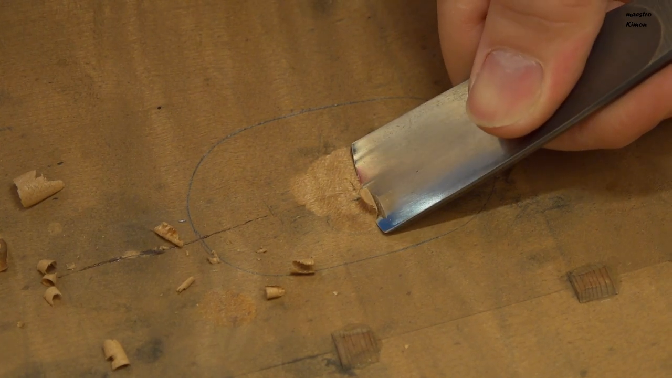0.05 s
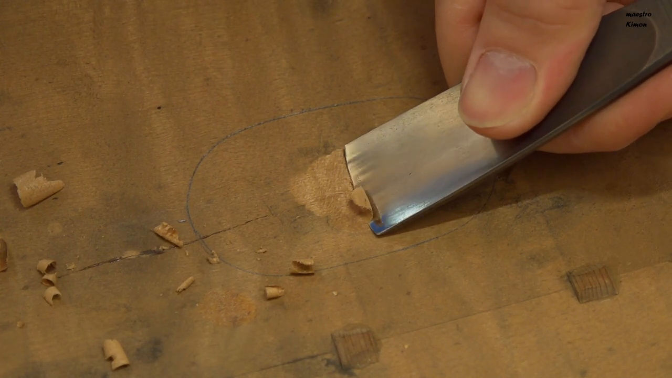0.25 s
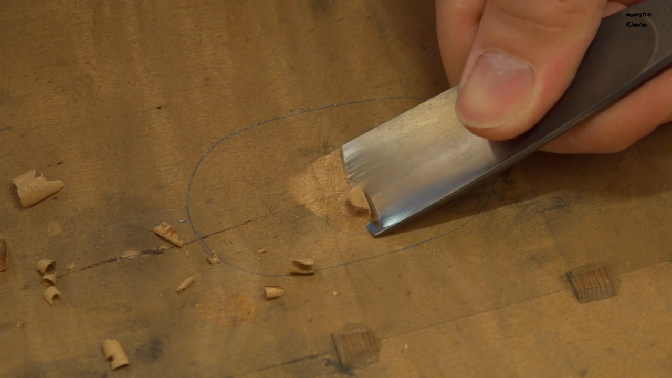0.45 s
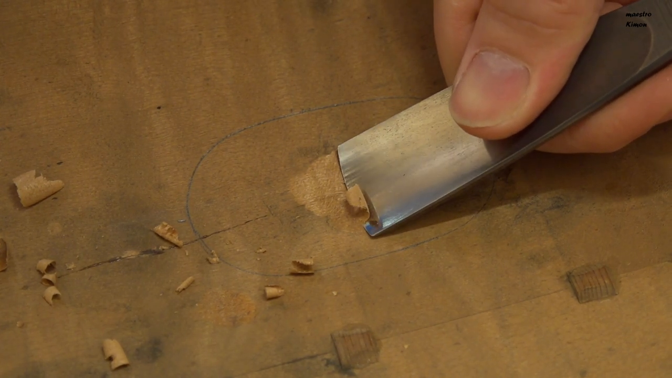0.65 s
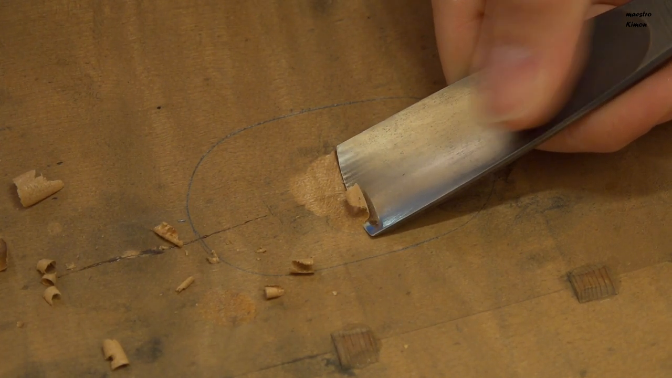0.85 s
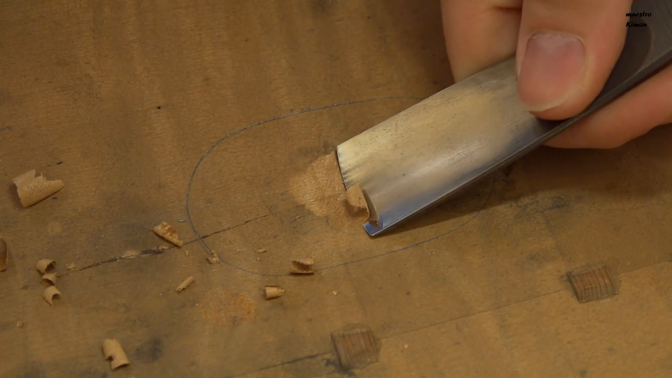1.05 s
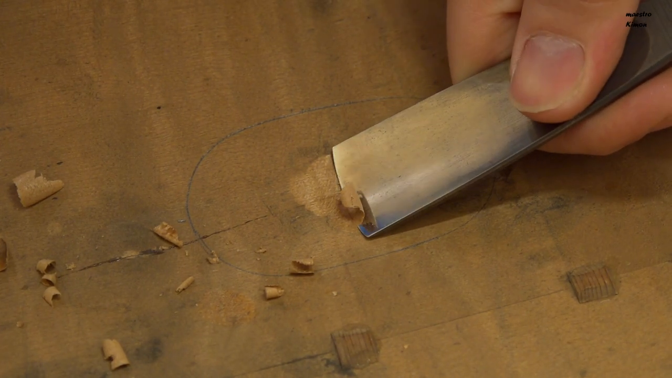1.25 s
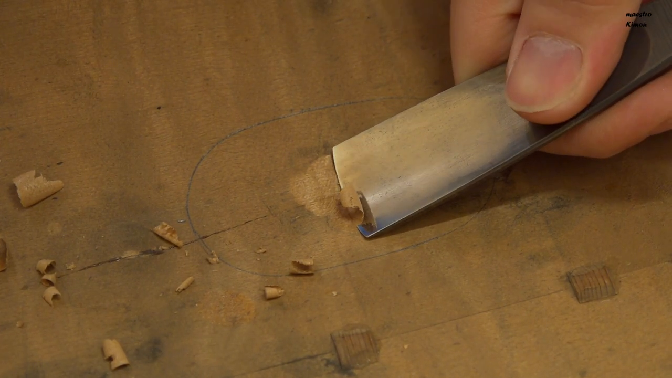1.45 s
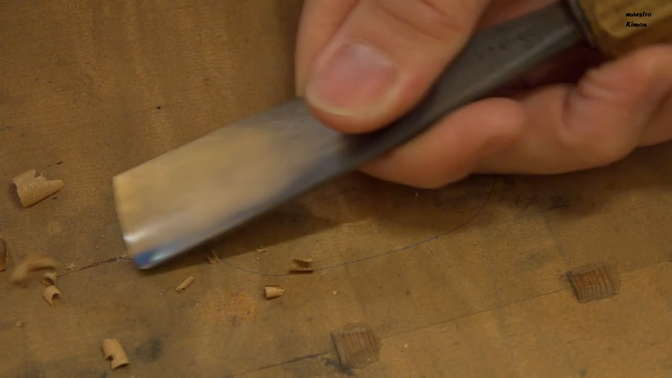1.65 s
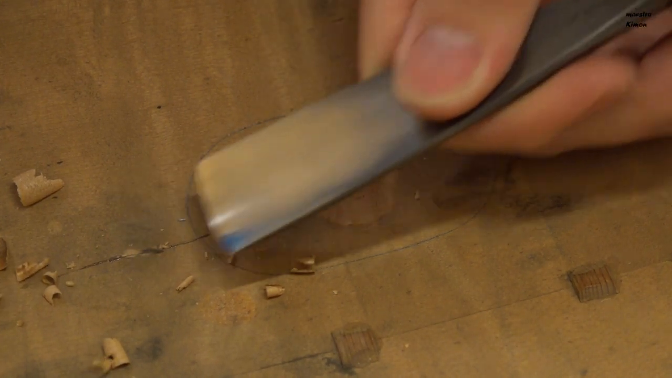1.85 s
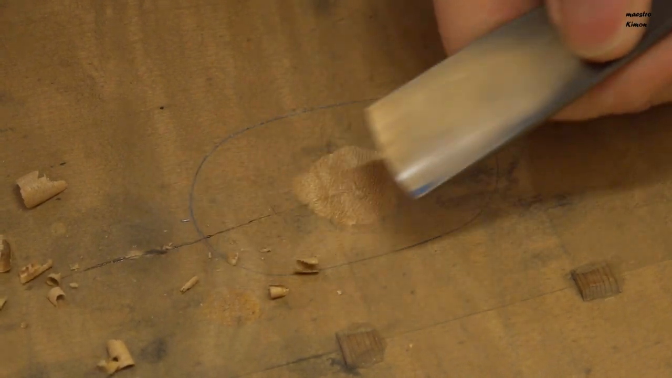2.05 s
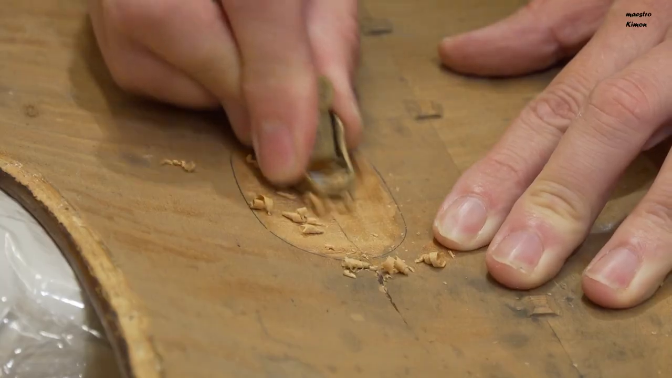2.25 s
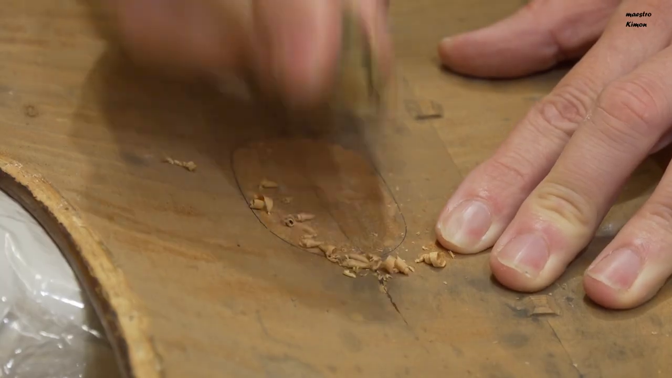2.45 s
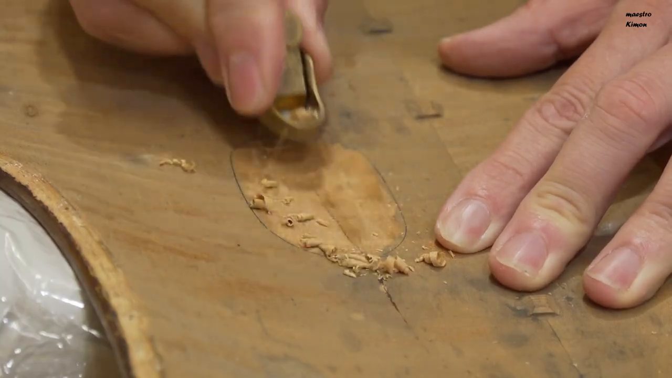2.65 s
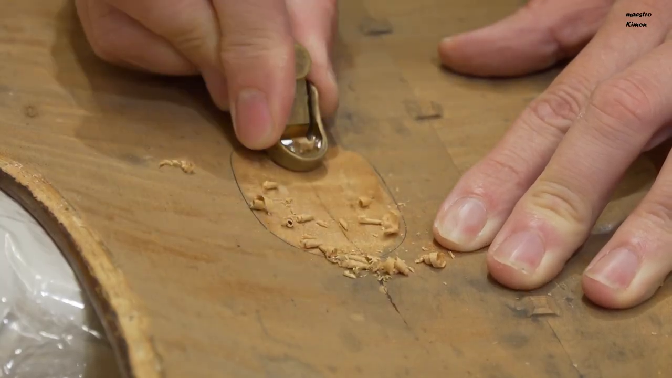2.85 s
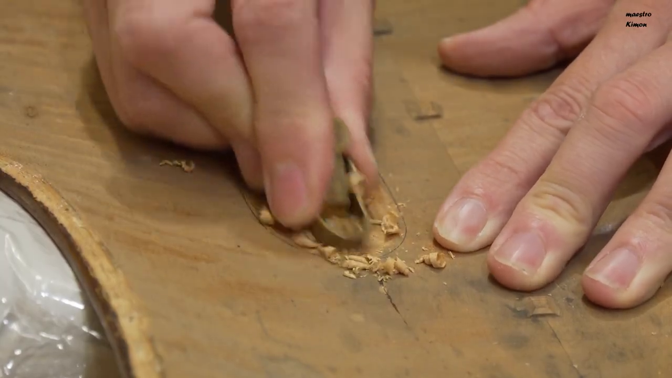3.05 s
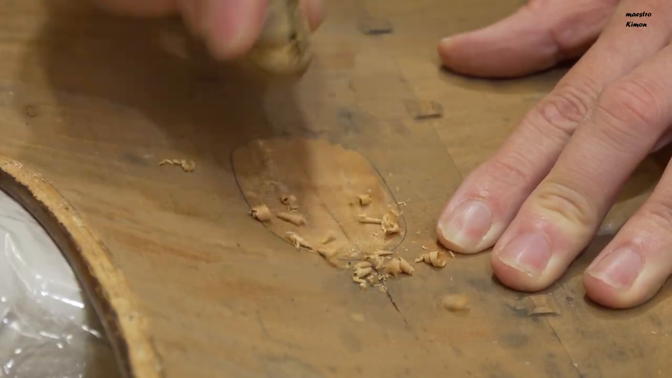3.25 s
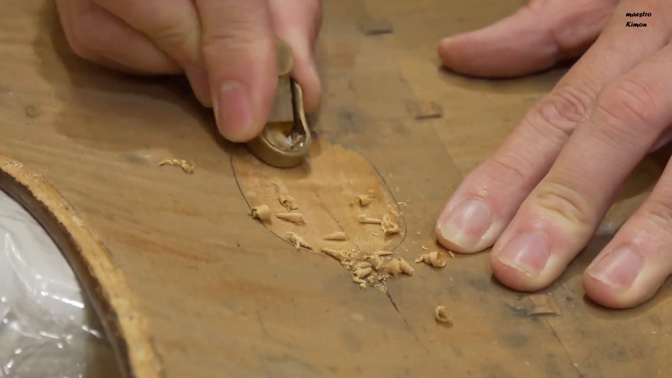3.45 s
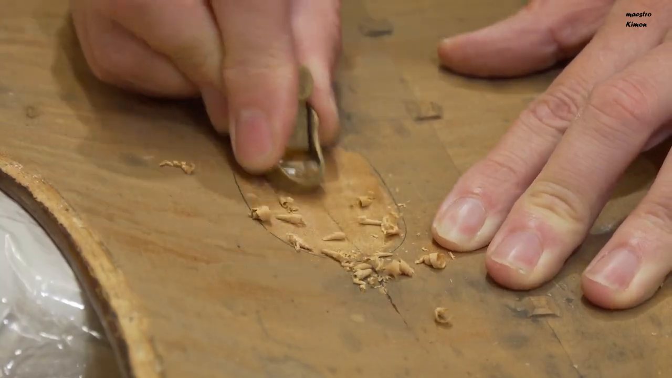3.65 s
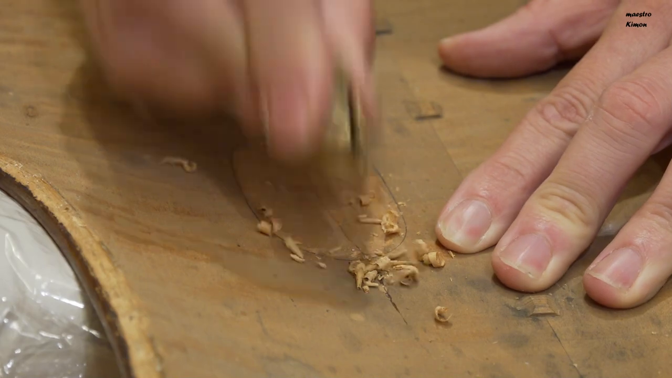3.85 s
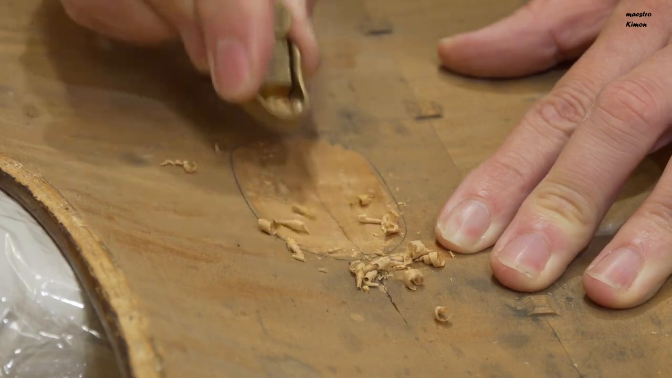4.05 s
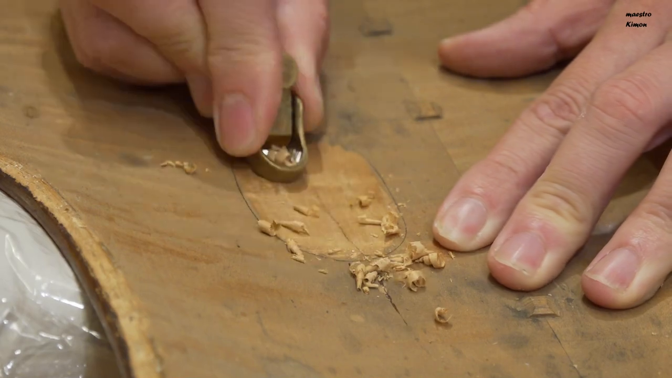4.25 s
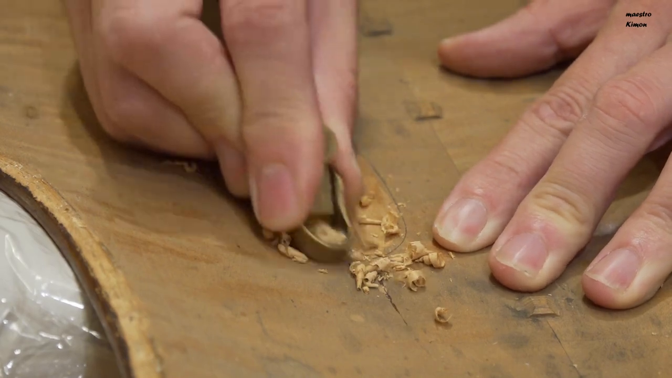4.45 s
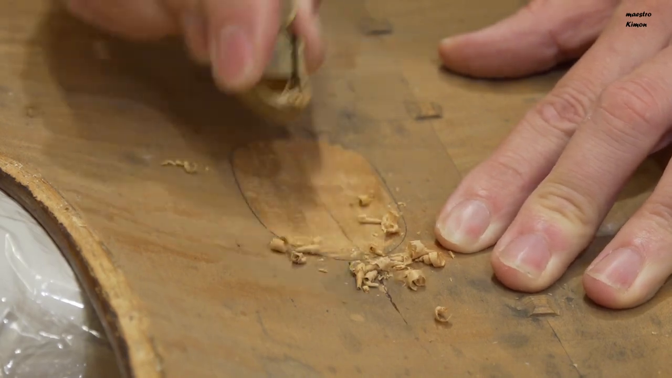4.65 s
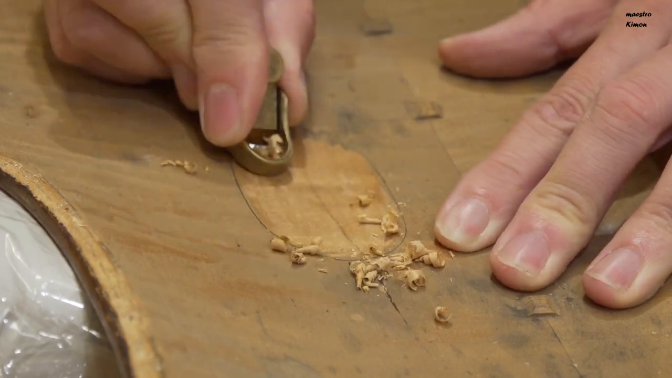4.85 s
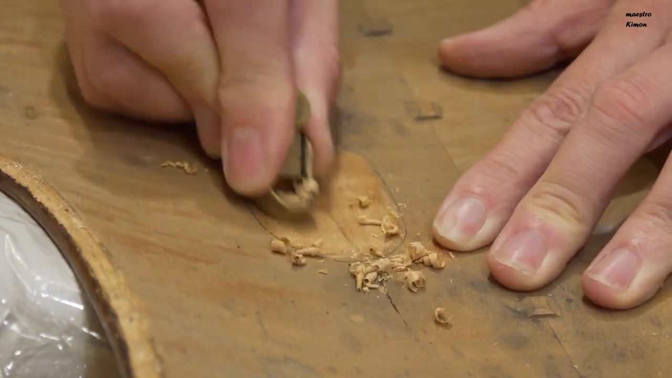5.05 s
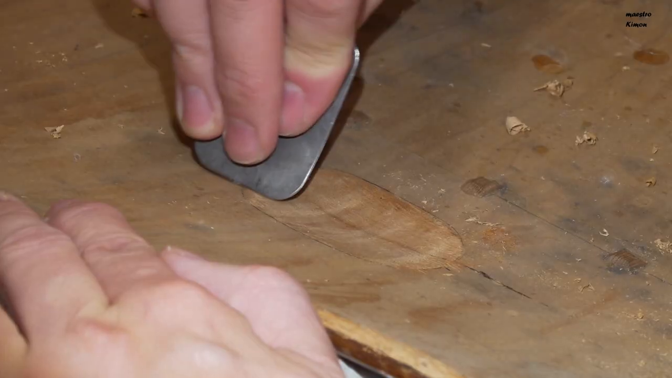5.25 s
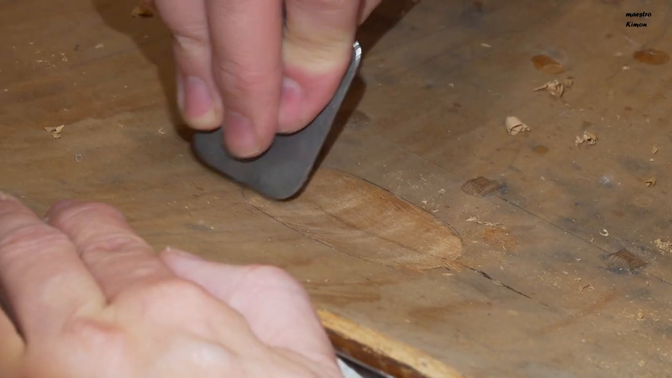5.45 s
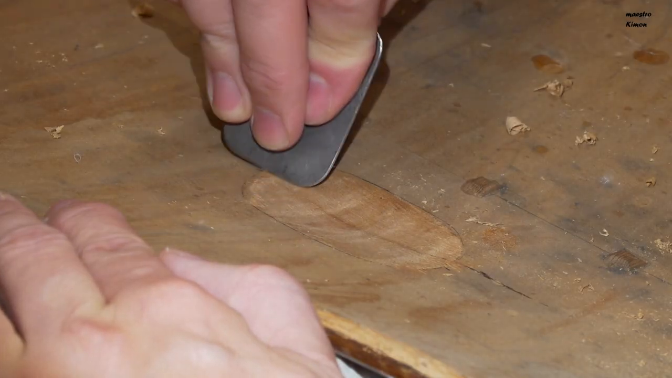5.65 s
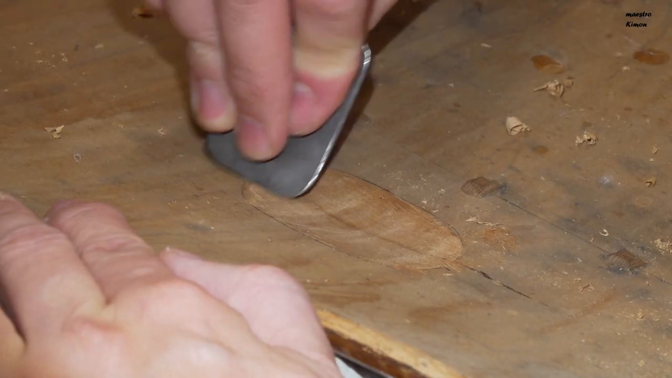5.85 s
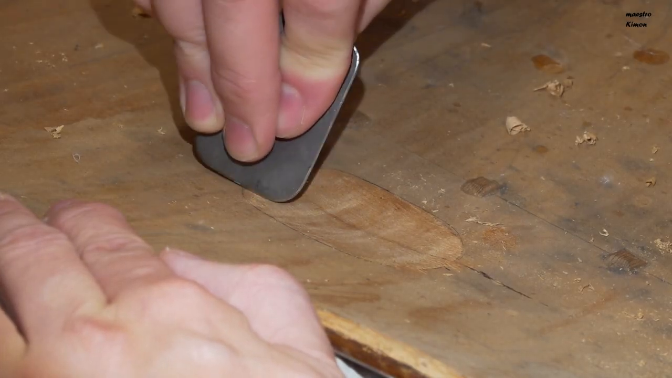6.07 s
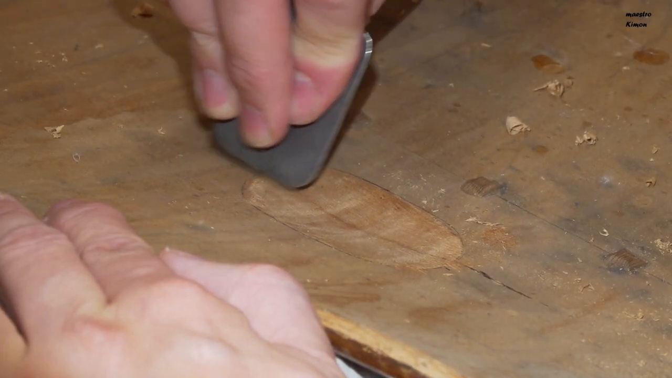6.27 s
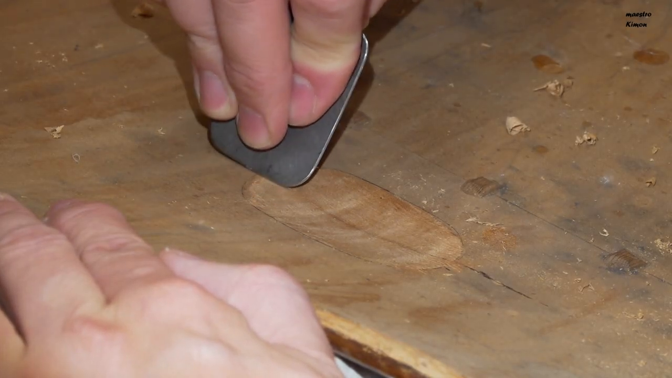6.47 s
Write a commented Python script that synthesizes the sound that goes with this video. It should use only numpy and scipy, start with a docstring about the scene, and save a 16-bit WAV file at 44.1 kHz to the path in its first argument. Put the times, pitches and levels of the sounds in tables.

```python
"""A gouge crunches close by through four short cuts and a long one, hollowing an instrument's wooden back.
Next a brass thumb plane lands with a knock before each of five pushes along the grain, then a steel
scraper ticks down and rasps in quick strokes. Snapping fibres are random impulses, landings are single
impulses, and both excite resonances of the plate; stick-slip creaks are quickening sines.
A low rumble and faint hiss, both filtered noise, fill the workshop behind."""
import sys
import numpy as np
from scipy import signal
from scipy.fft import rfft, irfft, next_fast_len
from scipy.io import wavfile
from scipy.ndimage import uniform_filter1d

SR = 44100
rng = np.random.default_rng(int(sys.argv[2]) if len(sys.argv) > 2 else 0)


def to_wav(s):
    """Save 16-bit WAV."""
    ch = np.atleast_2d(s).T  # columns
    pcm = np.round(np.clip(ch, -1, 1) * 32767)  # PCM
    wavfile.write(sys.argv[1], SR, pcm.astype(np.int16))


N = 287091
TIME = np.arange(N) / SR  # s

# Levels in the event tables are relative; spectra are relative levels against pitch.

# stick-slip creaks of the gouge: middle_s, length_s, slip_rate_per_s, level_db
GOUGE_CREAKS = [(0.189, 0.028, 420, -33.5), (0.565, 0.028, 426, -32.5), (0.952, 0.016, 560, -38.5),
                (1.3, 0.018, 383, -33), (1.313, 0.024, 520, -37), (1.643, 0.016, 1100, -25),
                (1.659, 0.011, 570, -20.5), (1.672, 0.018, 710, -26), (1.727, 0.035, 500, -29.5)]
# spectrum of the crunch in the plate: pitch_hz, level_db
CRUNCH_SPECTRUM = [(59, -50.5), (100, -6.5), (175, -3), (255, -11), (295, -0.5), (536, -2.5), (754, -3.5),
                   (1000, -6), (1170, -8), (1300, -14), (1850, -14.5), (2230, -21.5), (3000, -31.5),
                   (6600, -120)]
# spectrum of the fine fibre fizz: pitch_hz, level_db
FIZZ_SPECTRUM = [(1290, -40), (2200, 0.5), (3770, 0.5), (6860, 0.5), (8300, -3.5), (12500, -10.5),
                 (16000, -17)]
# spectrum of the plate's rumble under gouge and plane: pitch_hz, level_db
RUMBLE_SPECTRUM = [(15, -40), (40, -4), (90, -3), (150, 1.5), (230, -4.5), (400, -24.5), (900, -61)]
# resonances of plate and gouge together: pitch_hz, width_hz, level_db
GOUGE_MODES = [(321, 20, 2.5), (423, 50, 5), (620, 51, 2), (841, 24, 2), (1207, 28, 6.5), (1756, 54, 6),
               (1970, 55, 8)]
CRUNCH_SLOPES, FIZZ_SLOPES = (1800, 540), (1900, 960)  # (rise, fade) dB per s
BRIGHTENING, DULL_HZ = 0.16, 750  # exponent on cutting force; pitch above which it acts
GLIDE_RUMBLE_DB = -3  # the sliding bevel's rumble, relative to its crunch
SINGING_HZ, SINGING_DECAY_S = 488, 0.042  # plate mode; time to fall to 1/e
BENCH_HZ, BENCH_DECAY_S = 46, 0.081  # rocking of the bench; time to fall to 1/e


def gouge():
    """Brittle fracture: bursts of snapping fibres excite the plate, while the bench rocks as a damped mode."""
    grain = amp(1.6 * unevenness(per_s=150))
    coarse = snaps(per_s=1200, spread_db=1.5) * grain
    fine = snaps(per_s=9000, spread_db=1.8) * grain
    force = cutting(CRUNCH_SLOPES, column=2)
    crunch = voiced(coarse, colour(CRUNCH_SPECTRUM, GOUGE_MODES), amp(-2.0) * force)
    dull = signal.sosfiltfilt(signal.butter(2, DULL_HZ, fs=SR, output="sos"), crunch)
    # the harder the cut, the brighter the crunch
    crunch = dull + (crunch - dull) * (force / amp(-31.5)) ** BRIGHTENING
    fizz = voiced(fine, colour(FIZZ_SPECTRUM), amp(-2.0) * cutting(FIZZ_SLOPES, column=3))
    rumble = voiced(coarse, colour(RUMBLE_SPECTRUM), amp(GLIDE_RUMBLE_DB) * gliding(column=2))
    # one plate mode sings on after each lurch
    singing_mode = np.sin(2 * np.pi * SINGING_HZ * TIME) * np.exp(-TIME / SINGING_DECAY_S)
    singing = through(blows(GOUGE_LURCHES, column=5), singing_mode)
    bench_mode = np.sin(2 * np.pi * BENCH_HZ * TIME) * np.exp(-TIME / BENCH_DECAY_S)
    bench = through(blows(GOUGE_LURCHES, column=4), bench_mode)
    cut = ring(crunch + fizz + rumble, wet_db=-8, onset=0.0014)
    return cut + chips() + judder(GOUGE_CREAKS) + singing + bench


# the gouge lurches forward and stops:
# start_s, length_s, crunch_db, fizz_db, bench_rocking_db, plate_singing_db
GOUGE_LURCHES = [(0.179, 0.01, -36, -49, -35, -47), (0.207, 0.012, -35, -46.5, -47, -46),
                 (0.551, 0.012, -35.5, -47.5, -37, -40), (0.966, 0.004, -45, -60, -62, -44.5),
                 (1.294, 0.0088, -36, -46.5, -43, -35), (1.622, 0.015, -25.5, -38, -51, -55),
                 (1.638, 0.021, -23.5, -34, -34, -32), (1.678, 0.035, -29, -38.5, -35, -46)]


def cutting(slopes, column):
    """Force envelope of the gouge: at each instant the strongest lurch or glide prevails."""
    lurches = [stroke(row[0], row[1], row[column], slopes) for row in GOUGE_LURCHES]
    return np.max(lurches + [gliding(column)], axis=0)


# the edge creeps or glides lightly: start_s, length_s, crunch_db, fizz_db, easing_db_per_s
GOUGE_GLIDES = [(0.68, 0.35, -55.5, -67.5, -3), (1.773, 0.076, -37.5, -46, 68),
                (1.96, 0.31, -53.5, -60.5, 16.5)]
GLIDE_SLOPES = (200, 390)  # (rise, fade) dB per s


def gliding(column):
    """Light-contact envelope: the edge creeps or glides with a slow change of level."""
    glides = [stroke(row[0], row[1], row[column], GLIDE_SLOPES, easing=row[4]) for row in GOUGE_GLIDES]
    return np.max(glides, axis=0)


# chips crack off or are flicked aside: start_s, plate_knock_db, crack_db, crack_pitch_hz
CHIP_EVENTS = [(0.182, -41, -35, 7200), (0.9455, -32.5, -35.5, 8900), (1.0126, -43, -50, 1990),
               (1.6155, -29, -34, 7000), (1.6294, -23, -34, 5000), (1.6387, -18, -27, 5570),
               (1.644, -20, -21, 6030), (1.866, -33, -31, 6200), (1.903, -37, -41, 5270),
               (1.979, -35, -42, 5760), (2.041, -40, -49, 11100), (2.099, -40, -50.5, 11000)]
# spectrum of the plate's woody knock: pitch_hz, level_db
CHIP_SPECTRUM = [(100, -16.5), (500, 5), (1150, 0.5), (2200, -12.5), (9000, -38)]
CRACK_S, CRACK_DB_PER_OCTAVE = 0.0011, 14  # time to 1/e; fall either side of the crack's pitch


def chips(size=2048):
    """Impulsive fracture: a brief noise burst around one pitch, answered by the resonant plate."""
    cracks = np.zeros(N)
    hz = np.fft.rfftfreq(size, 1 / SR)
    for start, _, db, crack_hz in CHIP_EVENTS:
        band = amp(-CRACK_DB_PER_OCTAVE * abs(np.log2((hz + 1) / crack_hz)))
        random_phase = np.exp(2j * np.pi * rng.random(len(hz)))
        crack = irfft(band * random_phase) * np.exp(-TIME[:size] / CRACK_S)
        cracks[round(start * SR):][:size] += amp(db) * crack / abs(crack).max()
    knocks = through(blows(CHIP_EVENTS, column=1), colour(CHIP_SPECTRUM, GOUGE_MODES))
    return ring(cracks, wet_db=-5, onset=0.002) + ring(knocks, wet_db=-3.5, onset=0.0017)


# the blade digs in and tears the grain: start_s, length_s, level_db
GRAIN_TEARS = [(2.302, 0.013, -25.5), (2.381, 0.069, -23.5), (2.992, 0.035, -29), (3.137, 0.018, -24),
               (3.671, 0.012, -30), (3.734, 0.028, -28), (4.418, 0.021, -32), (4.509, 0.02, -25),
               (5.008, 0.028, -35), (5.097, 0.05, -19.5)]
# the plane judders where the grain grabs it: middle_s, length_s, slip_rate_per_s, level_db
PLANE_JUDDERS = [(2.395, 0.046, 285, -22.5), (2.436, 0.06, 680, -30), (2.99, 0.084, 364, -26.5),
                 (3.021, 0.045, 633, -24.5), (3.06, 0.019, 294, -22.5), (3.124, 0.076, 270, -28),
                 (3.713, 0.07, 375, -24), (3.75, 0.047, 652, -21), (3.801, 0.035, 360, -24),
                 (4.426, 0.025, 700, -24), (4.437, 0.06, 290, -22.5), (4.474, 0.022, 280, -20),
                 (4.513, 0.039, 287, -23), (5.035, 0.078, 328, -28), (5.083, 0.03, 300, -19.5),
                 (5.113, 0.027, 319, -19)]
# spectrum of the rubbing sole: pitch_hz, level_db
SOLE_SPECTRUM = [(12, -52), (30, -20.5), (90, -13), (220, -5.5), (290, 0.5), (420, 0), (700, -2.5),
                 (950, -5.5), (1200, -9), (1700, -18.5), (2300, -42)]
# spectrum of the chattering blade: pitch_hz, level_db
CHATTER_SPECTRUM = [(900, -38), (1200, -8), (1400, 1), (1650, 3), (1850, -19), (2050, -14.5), (2300, -36.5),
                    (3500, -64)]
# spectrum of the hissing shaving: pitch_hz, level_db
HISS_SPECTRUM = [(1350, -38), (2300, -7), (2840, 2), (3450, -3), (3930, 1.5), (4130, -3.5), (5180, 1.5),
                 (7160, -8.5), (8920, -7), (13600, -12), (16000, -20)]
# resonances of plate and plane together, and some deep nulls: pitch_hz, width_hz, level_db
PLANE_MODES = [(41.8, 12, 7.5), (100, 11, -7), (302, 38, 2), (470, 10, 12.5), (510, 17, -24.5),
               (584.5, 5.3, 9), (730, 32, 4.5), (1223, 46, -9.5), (1436, 30, 4.5), (3275, 120, -5.5),
               (4084, 130, -22.5)]
# a level spectrum, leaving only resonances and nulls: pitch_hz, level_db
FLAT_SPECTRUM = [(20, 0), (20000, 0)]
TEAR_SLOPES = (3300, 440)  # (rise, fade) dB per s
# arches of a push: (lag s, depth at start dB, depth at end dB, exponent of the curve)
RUB_ARCH, CHATTER_ARCH = (-0.02, 40, 28, 2), (0.0027, 35.5, 57.5, 2.15)
HISS_ARCH, RUMBLE_ARCH = (0.028, 24.8, 79, 1.98), (0.055, 32, 83, 1.85)


def plane_strokes():
    """Friction over a rough surface: rising speed raises ridge pitch; the plate rumbles under the hand."""
    speed = np.ones(N)
    for start, rise, fall, *_, pace in PLANE_PUSHES:
        progress = np.clip((TIME - start) / (rise + fall), 0, 1)
        speed = np.where(TIME >= start, pace * amp(2.2 * (progress - 0.5)), speed)
    travel = np.cumsum(speed) % N
    grain = amp(1.2 * unevenness(per_s=46))
    plate = colour(FLAT_SPECTRUM, PLANE_MODES)
    ridges = riding(through(snaps(per_s=1200, spread_db=2.5), colour(SOLE_SPECTRUM)), travel)
    slips = riding(through(snaps(per_s=910, spread_db=1.5), colour(CHATTER_SPECTRUM)), travel)
    tearing = sum(stroke(*tear, TEAR_SLOPES) for tear in GRAIN_TEARS)
    rub_gain = np.hypot(pushing(RUB_ARCH, column=3), tearing * gate())
    rub = evened(through(ridges * grain, plate)) * amp(-0.5) * rub_gain
    chatter = evened(through(slips * grain, plate)) * amp(-1.0) * pushing(CHATTER_ARCH, column=4)
    fibres = snaps(per_s=15000, spread_db=0.5) * amp(1.2 * unevenness(per_s=150))
    shaving = fraying(fibres, depth_db=3.5)
    hiss = voiced(shaving, colour(HISS_SPECTRUM), amp(-4.0) * pushing(HISS_ARCH, column=5))
    rumble = evened(through(snaps(per_s=550, spread_db=3.5), colour(RUMBLE_SPECTRUM, PLANE_MODES)))
    rumble = rumble * pushing(RUMBLE_ARCH, column=6)
    # the pressing hand damps the plate, while the hiss carries into the room
    body = ring(rub + chatter + rumble + judder(PLANE_JUDDERS), wet_db=-24.5, onset=0.006)
    return body + ring(hiss, wet_db=-8.0, onset=0.0024)


# the plane is pushed: start_s, rise_to_full_s, fall_to_rest_s,
# sole_rub_db, blade_chatter_db, shaving_hiss_db, rumble_db, relative_speed (ratio)
PLANE_PUSHES = [(2.198, 0.19, 0.17, -29, -32, -37, -31, 1.024),
                (2.9, 0.2, 0.14, -25, -29, -35.5, -34, 1.028),
                (3.607, 0.2, 0.14, -22, -26.5, -36.5, -34, 1.013),
                (4.305, 0.169, 0.125, -21, -30, -36.5, -33, 0.97),
                (4.962, 0.17, 0.15, -24.5, -30.5, -36.5, -28.5, 0.99)]


def pushing(arch, column):
    """Effort envelope of the plane: every push swells and sinks in the same arch of decibels."""
    lag, start_db, end_db, exponent = arch
    gain = np.zeros(N)
    for push in PLANE_PUSHES:
        start, rise, fall = push[:3]
        t = TIME - start - rise - lag
        swell, sink = start_db * abs(t / rise) ** exponent, end_db * abs(t / fall) ** exponent
        gain += amp(push[column] - np.where(t < 0, swell, sink))
    return gain * gate()


GATE_S, GATE_DB_PER_S = 5.147, 4010


def gate():
    """Gate: full gain until the sound of the last push is cut short, then a steep fade."""
    return amp(-GATE_DB_PER_S * np.maximum(TIME - GATE_S, 0))


HEEL_LAG_S, HEEL_DB = 0.003433, -10.5  # lag at relative speed 1


def riding(surface, travel):
    """Comb filtering: toe then heel of the sole meet the same ridges; the comb climbs with speed."""
    at = np.arange(N)
    toe = np.interp(travel, at, surface)
    return toe + amp(HEEL_DB) * np.interp(travel - HEEL_LAG_S * SR, at, surface)


def fraying(x, depth_db, count=9):
    """Band-wise modulation: the shaving curls and splits, so each half octave swells on its own."""
    place = 2 * np.log2(np.clip(np.fft.rfftfreq(N, 1 / SR), 1000, 16000) / 1000)
    spectrum = rfft(x)
    bands = [irfft(spectrum * np.maximum(1 - abs(place - k), 0), N) for k in range(count)]
    return evened(sum(band * amp(depth_db * unevenness(per_s=22)) for band in bands))


# the plane lands: start_s, thump_db, tick_db
PLANE_LANDINGS = [(2.1908, 0, 0.5), (2.8028, 0.5, 2.5), (3.5346, 0.5, 2.5), (4.2285, -0.5, -7.5),
                  (4.877, -5, -8.5)]
# spectrum of the thump in the wood: pitch_hz, level_db
THUMP_SPECTRUM = [(30, -14.5), (55, -2.5), (90, -15.5), (200, -7.5), (320, 5), (600, 6), (920, 4),
                  (1250, -9), (1600, -3.5), (2000, -28.5), (4000, -44.5), (9000, -64)]
# spectrum of the tick of the brass: pitch_hz, level_db
BRASS_SPECTRUM = [(200, 1.5), (900, 8.5), (2200, 0), (3000, -3), (5000, -1.5), (6500, -6.5), (7500, -11.5),
                  (10000, -15.5), (16000, -28.5)]
# modes of the plate that ring on after a landing: pitch_hz, level_db
LANDING_MODES = [(588, -26.5), (745, -28), (862, -27.5), (1040, -33), (1455, -40), (2440, -41.5),
                 (2560, -42.5)]
# pitches at which the landing spot hardly moves: pitch_hz, width_hz, level_db
LANDING_NULLS = [(1700, 26, -16.5)]
KNOCK_DAMPING = 2.4  # a landing widens and lowers the resonances by this factor
KNOCK_RING_S, THUMP_LAG_S = 0.02, 0.0011  # time for the modes to fall to 1/e; delay after the tick


def plane_knocks():
    """Impact excitation: brass ticks on wood, then the plate gives way and rings in its own modes."""
    out = np.zeros(N)
    damped = []
    for hz, width, db in PLANE_MODES:
        damping = KNOCK_DAMPING if db > 0 else 1  # nulls stay as they are
        damped.append((hz, width * damping, db / damping))
    brass, wood = colour(BRASS_SPECTRUM), colour(THUMP_SPECTRUM, damped)
    for knock in PLANE_LANDINGS:
        tick = -amp(-4.5) * through(blows([knock], column=2), brass)
        bounces = through(tick, contact(rattle_db=-15.0, settle=0.0024))
        thump = through(blows([knock], column=1), wood)
        thump = np.interp(TIME - THUMP_LAG_S, TIME, thump)
        out += ring(tick, wet_db=-5.0, onset=0.002) + bounces + ring(thump, wet_db=-13.0, onset=0.0053)
    modes = sum(amp(db) * np.sin(2 * np.pi * hz * TIME) for hz, db in LANDING_MODES)
    modes = modes * np.exp(-TIME / KNOCK_RING_S)
    landing = through(out, colour(FLAT_SPECTRUM, LANDING_NULLS))
    return landing + through(blows(PLANE_LANDINGS, column=1), modes)


# the scraper is drawn: start_s, cutting_time_s, pressing_time_s, drag_db, rasp_db
SCRAPER_STROKES = [(5.327, 0.047, 0.074, -32.5, -37), (5.423, 0.002, 0.0028, -29, -49),
                   (5.646, 0.031, 0.093, -26, -22.5), (5.929, 0.032, 0.089, -24, -23.5),
                   (6.214, 0.043, 0.099, -25.5, -25), (6.492, 0.036, 0.15, -23.5, -21)]
# the burr bites and skips: start_s, rasp_db
BURR_BITES = [(5.3208, -20.5), (5.329, -22), (5.3423, -18.5), (5.3525, -25.5), (5.363, -25), (5.3695, -25),
              (5.385, -25.5), (5.4081, -30.5), (5.4575, -23.5), (5.467, -26.5), (5.637, -21), (5.6455, -26),
              (5.6595, -18), (5.9615, -16.5), (6.2075, -21.5), (6.482, -24), (6.494, -20)]
# the scraper judders as the hand eases: middle_s, length_s, slip_rate_per_s, level_db
SCRAPER_GROANS = [(6.286, 0.048, 345, -24.5)]
# spectrum of the drag on the plate: pitch_hz, level_db
DRAG_SPECTRUM = [(59, -47), (100, -16.5), (150, -5.5), (247, -3), (329, 4.5), (430, -5.5), (680, -8),
                 (1070, -12.5), (1570, -15.5), (2200, -25.5), (4840, -120)]
# spectrum of the rasping edge: pitch_hz, level_db
RASP_SPECTRUM = [(1180, -20), (2000, -8), (2300, -3.5), (2800, 4), (3120, -4), (3430, 4), (4080, -5.5),
                 (6090, 0.5), (6530, -5.5), (7700, 1), (9580, -10.5), (10200, -8.5), (11300, -15.5),
                 (13700, -12.5), (16000, -20)]
# spectrum of the low thud under the scraper: pitch_hz, level_db
THUD_SPECTRUM = [(20, -22), (45, 10), (65, -8), (105, -22), (160, -3), (300, -8.5), (800, -67)]
# resonances and nulls of plate and scraper together: pitch_hz, width_hz, level_db
SCRAPER_MODES = [(153.5, 9.7, 8), (622, 44, 6), (730, 40, 9), (896, 91, 5.5), (1610, 230, 7),
                 (1840, 100, -9), (2680, 260, 3), (3860, 84, 3.5), (4430, 95, 8), (5130, 130, 6.5),
                 (6230, 130, 8), (6850, 110, 7.5)]
DRAG_SLOPES, RASP_SLOPES = (1760, 520), (3200, 320)  # (rise, fade) dB per s
DRAG_EASING_DB_PER_S = 41
BITE_S = 0.0011  # a bite swells for this long, then dies away


def scraper():
    """Stick-slip friction: the burr bites with a bright rasp, then drags duller as the hand eases."""
    turns = np.cumsum(125 * amp(3 * unevenness(per_s=150))) / SR
    # each slip starts hard and dies away until the edge sticks again
    catch = amp(-11 * (turns % 1))
    bites = through(blows(BURR_BITES, column=1), TIME / BITE_S * np.exp(1 - TIME / BITE_S))
    pressure, cut = np.zeros(N), np.zeros(N)
    for start, cutting_s, pressing_s, drag_db, rasp_db in SCRAPER_STROKES:
        pressure += stroke(start, pressing_s, drag_db, DRAG_SLOPES, DRAG_EASING_DB_PER_S)
        cut += stroke(start, cutting_s, rasp_db, RASP_SLOPES)
    drag_gain = amp(-2.5) * pressure + amp(-5.5) * bites
    drag = voiced(snaps(per_s=3000, spread_db=1.0) * catch, colour(DRAG_SPECTRUM, SCRAPER_MODES), drag_gain)
    fibres = snaps(per_s=20000, spread_db=1.2)
    rasp_gain = np.hypot(amp(-3.5) * cut * evened(catch), amp(-2.0) * bites)
    rasp = voiced(fibres, colour(RASP_SPECTRUM, SCRAPER_MODES), rasp_gain)
    bench = voiced(rng.standard_normal(N), colour(THUD_SPECTRUM), amp(-28.0) * pressure)
    return ring(drag + rasp + bench + judder(SCRAPER_GROANS), wet_db=-8.5, onset=0.0035)


# the scraper lands or flicks free: start_s, tick_db, thud_db, brightness_db_per_octave
SCRAPER_TAPS = [(5.2822, -3.5, -28, 1), (5.5709, -19, -31.5, -5.5), (5.794, -17.5, -45, -0.5),
                (5.869, -11, -31, -0.5), (6.077, -14, -35.5, 4.5), (6.158, -14.5, -29.5, -3),
                (6.429, -15, -29.5, -6.5)]
# spectrum of the steel tick before its brightness is applied: pitch_hz, level_db
STEEL_SPECTRUM = [(100, -7), (200, 2.5), (500, 1), (1500, 0.5), (1900, -7), (2550, 3), (3220, -6),
                  (3700, -5), (5000, -10), (8000, -11.5), (11000, -23), (16000, -33)]


def scraper_taps():
    """Contact stiffness: springy steel rattles on wood, and a sharper contact excites more treble."""
    ticks = np.zeros(N)
    for tap in SCRAPER_TAPS:
        steel = [(hz, db + tap[3] * np.log2(1 + hz / 2500)) for hz, db in STEEL_SPECTRUM]
        tick = through(blows([tap], column=1), colour(steel))
        bounces = through(tick, contact(rattle_db=-13.5, settle=0.0022))
        ticks += ring(tick, wet_db=-2.0, onset=0.00047) + bounces
    return through(blows(SCRAPER_TAPS, column=2), colour(THUD_SPECTRUM)) - amp(1.0) * ticks


def contact(rattle_db, settle, size=256):
    """Repeated impact: decaying smoothed noise for the tiny soft bounces after a sharp touch."""
    bounces = uniform_filter1d(rng.standard_normal(size), size=4)
    return amp(rattle_db) * bounces * np.exp(-TIME[:size] / settle)


JUDDER_OCTAVES_PER_S = 2.47  # the slips quicken


def judder(events):
    """Stick-slip oscillation: a rough, quickening rhythm makes the plate groan or creak."""
    out = np.zeros(N)
    wander = amp(0.7 * unevenness(per_s=120))
    for middle, length, per_s, db in events:
        near = abs(TIME - middle) < length / 2
        t = TIME[near] - middle
        turns = np.cumsum(per_s * wander[near] * 2 ** (JUDDER_OCTAVES_PER_S * t)) / SR
        slip = np.sin(2 * np.pi * turns)
        # slower slips also carry an octave
        slip = slip + amp(-15.5) * np.sin(4 * np.pi * turns) * (per_s < 1000)
        out[near] += amp(db) * evened(slip) * np.cos(np.pi * t / length) ** 2
    return out * amp(0.91 * unevenness(per_s=22))


# how long plate and workshop ring on: pitch_hz, t60_s
RING_TIMES = [(150, 0.32), (400, 0.11), (1000, 0.19), (2800, 0.17), (7300, 0.12), (14000, 0.1)]


def ring(x, wet_db, onset, size=16384, count=16):
    """Reverberation: sparse random taps form a dense tail, each band decaying at its own rate."""
    taps = np.zeros(size)
    places = np.arange(0, size, count) + rng.integers(0, count, size // count)
    taps[places] = rng.choice([-1, 1], size // count)
    hz, t, z = signal.stft(taps, SR, nperseg=256)
    decay = amp(-60 * t / read(RING_TIMES, hz)[:, None])
    tail = signal.istft(z * decay, SR)[1][:size]
    tail = tail * (1 - np.exp(-(TIME[:size] / onset) ** 2))
    return x + amp(wet_db) * through(x, tail / np.linalg.norm(tail))


# spectrum of the room tone: pitch_hz, level_db
ROOM_SPECTRUM = [(14, -23), (74, 0.5), (110, -20), (150, -12), (222, -19.5), (357, -17), (574, -25.5),
                 (1710, -35), (5380, -38.5), (12100, -39), (16000, -43)]
ROOM_TONE_DB = -54.5


def workshop():
    """Broadband background: filtered noise gives a low rumble and faint hiss, drifting slightly."""
    air = evened(through(rng.standard_normal(N), colour(ROOM_SPECTRUM)))
    return amp(ROOM_TONE_DB + 0.76 * unevenness(per_s=2.9)) * air


def snaps(per_s, spread_db):
    """Random impulse process: fibres break at random moments; most are small, a few large."""
    size = amp(spread_db * np.minimum(rng.exponential(1, N), 4))
    return size * rng.choice([-1, 1], N) * (rng.random(N) < per_s / SR)


def blows(events, column):
    """Impulse excitation: one impulse an event, as strong as the chosen column."""
    train = np.zeros(N)
    for row in events:
        train[round(row[0] * SR)] = amp(row[column])
    return train


def unevenness(per_s):
    """Low-pass random modulation of rms 1: hard and soft places in the wood, or a slow drift."""
    size = next_fast_len(N)
    hz = np.fft.rfftfreq(size, 1 / SR)
    smoothed = rfft(rng.standard_normal(size)) * np.exp(-(hz / per_s) ** 2)
    return evened(irfft(smoothed, size)[:N])


def stroke(start, length, db, slopes, easing=0):
    """Exponential envelope: a rise up to the start, a hold that eases off, then a fade."""
    rise, fade = slopes
    t = TIME - start
    before, during, after = np.maximum(-t, 0), np.clip(t, 0, length), np.maximum(t - length, 0)
    return amp(db - abs(rise) * before - easing * during - abs(fade) * after)


def colour(spectrum, plate=(), size=8192):
    """Minimum-phase response, peak 1: a broad spectrum with the plate's resonances on it."""
    hz = np.fft.rfftfreq(size, 1 / SR)
    resonances = sum(gain / (1 + (2 * (hz - f) / width) ** 2) for f, width, gain in plate)
    db = read(spectrum, hz) + resonances
    log_gain = np.log(amp(np.concatenate([db, db[-2:0:-1]])))
    response = np.fft.ifft(np.exp(np.conj(signal.hilbert(log_gain)))).real[:size // 2]
    return response / abs(response).max()


def voiced(drive, response, gain):
    """Source and filter: a drive of rms 1, shaped by the gain, excites a response of unit energy."""
    return through(evened(drive) * gain, response / np.linalg.norm(response))


def through(x, response):
    """Linear filtering: convolves x with an impulse response."""
    return signal.oaconvolve(x, response)[:N]


def read(points, hz):
    """Log-frequency interpolation of a table."""
    f, value = np.transpose(points)
    return np.interp(np.log(hz + 1), np.log(f + 1), value)


def evened(x):
    """Power normalization: scales to rms 1."""
    return x / np.sqrt(np.mean(x ** 2) + 1e-20)


def amp(db):
    """Logarithmic level: decibels to gain."""
    return 10 ** (np.asarray(db) / 20)


def scene():
    """Superposition: the three tools in turn over the room tone."""
    return (gouge() + plane_knocks() + plane_strokes() + scraper_taps() + scraper() + workshop())[None]


EDGE_HZ = 16100


def record(dry):
    """Saturation and band limiting: peaks clip at full scale, then a low-pass removes the top."""
    clipped = np.clip(dry, -1, 1)
    low_pass = signal.firwin(401, EDGE_HZ, window=("kaiser", 9), fs=SR)
    return signal.oaconvolve(clipped, low_pass[None], "same")


dry = scene()
out = record(dry)
to_wav(out)
```